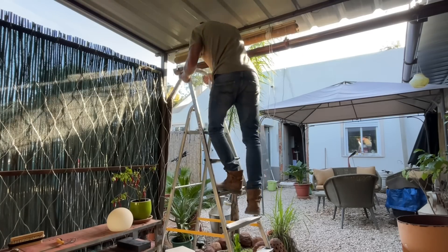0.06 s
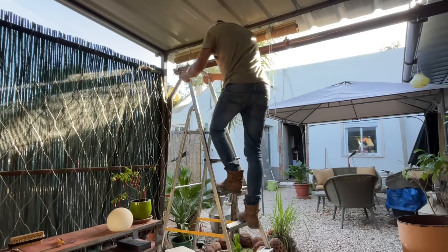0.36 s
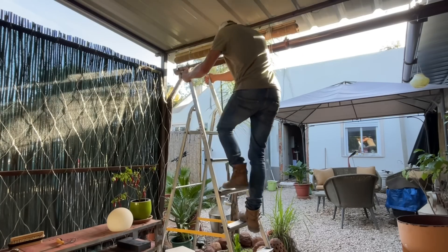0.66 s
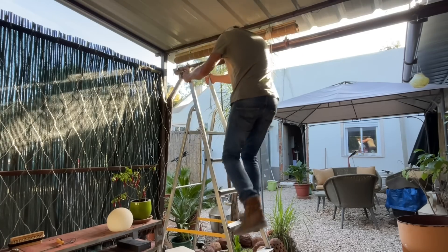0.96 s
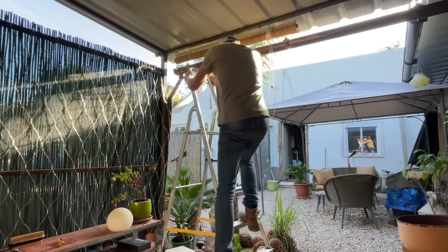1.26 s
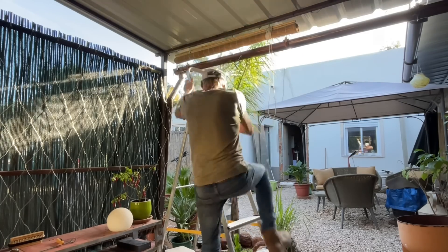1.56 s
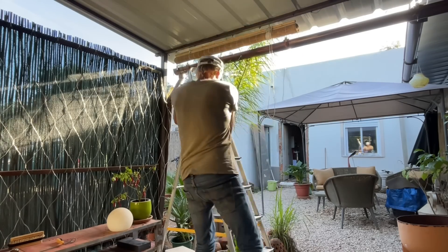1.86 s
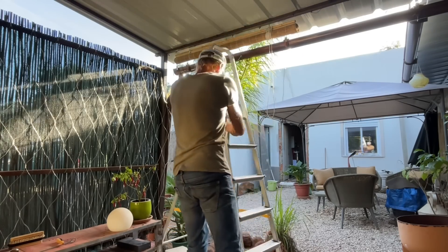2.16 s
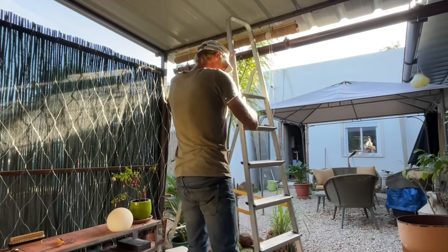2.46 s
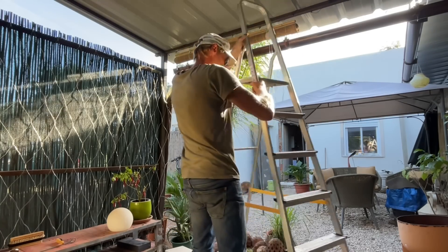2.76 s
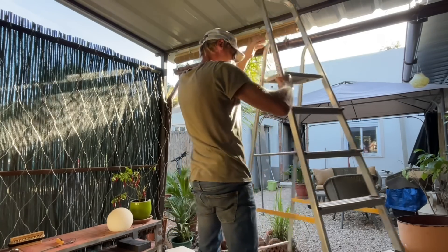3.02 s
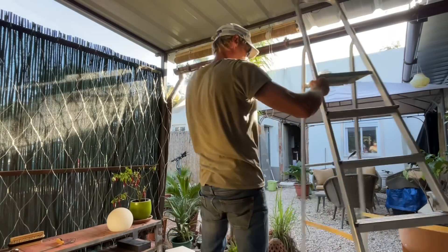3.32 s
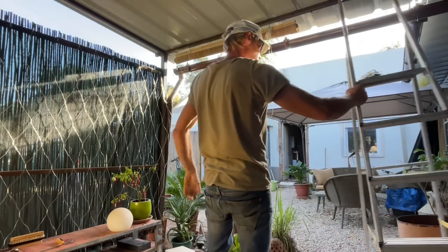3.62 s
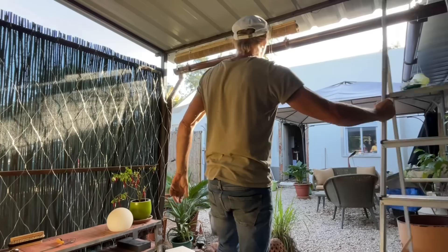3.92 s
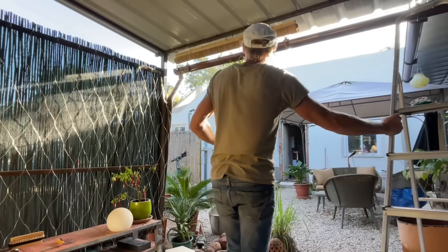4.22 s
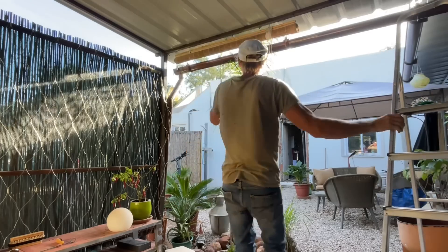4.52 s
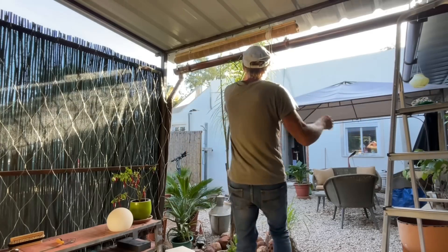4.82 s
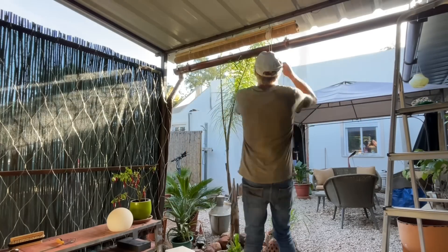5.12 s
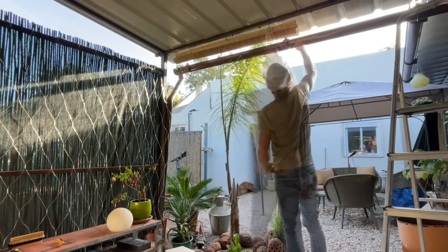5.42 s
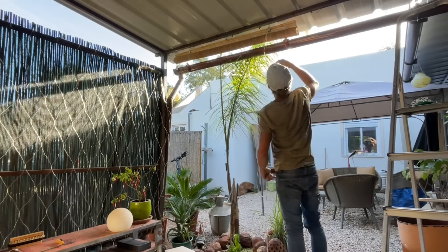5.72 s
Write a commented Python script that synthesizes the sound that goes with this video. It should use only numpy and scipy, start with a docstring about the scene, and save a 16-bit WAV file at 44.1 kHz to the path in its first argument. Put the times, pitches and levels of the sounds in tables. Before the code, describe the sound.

Boots step down a metal stepladder onto gravel, then the ladder clanks sharply and scrapes over the stones.

```python
"""Under a patio roof, a man climbs down an aluminium stepladder and lands on gravel. He lifts the
ladder, swings it aside, scrapes its feet over the stones and shuffles off. Impacts excite the metal's
normal modes, so it clanks and rings; friction on gravel, joints and cloth is a stream of tiny
collisions. Behind him a small bird calls far away and the air rumbles faintly."""
import sys
import numpy as np
from scipy import signal
from scipy.fft import rfft, irfft, next_fast_len
from scipy.io import wavfile
from scipy.ndimage import uniform_filter1d

SR = 44100
rng = np.random.default_rng(int(sys.argv[2]) if len(sys.argv) > 2 else 0)


def master_out(mix):
    """Clip the mix to full scale and print it as 16-bit PCM to the path in sys.argv[1]."""
    frames = np.transpose(np.atleast_2d(mix))
    ceiling = np.clip(frames, -1, 1)
    pcm = np.round(ceiling * 32767).astype(np.int16)
    wavfile.write(sys.argv[1], SR, pcm)


N = 254894
TIME = np.arange(N) / SR
TAIL = TIME[:SR]   # one second for each free decay
SIDES = np.array([[1], [-1]])   # left, right

# Levels in the tables are relative: each source applies its own gain.
# diffuse field, side signal relative to mid (f/Hz, level/dB)
FIELD_WIDTH = [(60, -8), (160, -9.5), (350, -4), (700, -0.5), (1800, -1), (7000, 0.5), (13000, -5.5)]
# diffuse field, left relative to right (f/Hz, level/dB)
FIELD_BALANCE = [(100, 0), (360, -2), (670, 1), (1500, -0.45), (4000, 3.5), (8000, 0.5), (13000, -1.5)]
# reverberation time of the patio (f/Hz, t60/s)
PATIO_DECAY = [(150, 0.55), (700, 0.28), (3000, 0.24), (12000, 0.17)]
# rise and fall of the low rumble, which swells as the boot lands near 1.6 s (t/s, level/dB)
RUMBLE_LEVELS = [(0.0, -66), (1.45, -81), (1.59, -68.5), (3.46, -73.5), (4.01, -66.5), (4.12, -66),
                 (4.83, -66), (5.78, -60.5)]
# spectrum of the moving air (f/Hz, level/dB)
RUMBLE_SPECTRUM = [(15, -36.5), (25, -17.5), (43, -4.5), (59, 5.5), (119, -10.5), (147, -2.5), (194, -22),
                   (260, -18), (340, -35.5), (570, -120)]
# spectrum of the yard's hiss (f/Hz, level/dB)
YARD_SPECTRUM = [(59, -33), (100, -4.5), (168, -22.5), (270, -11.5), (318, -8), (425, -20.5), (461, -15.5),
                 (2220, -25.5), (2840, -26), (13900, -37.5)]
# bird notes (t/s, length/s, start f/Hz, end f/Hz, level/dB)
BIRD_NOTES = [(0.458, 0.03, 2990, 3170, -54), (0.495, 0.022, 3900, 4430, -83),
              (3.429, 0.0487, 3080, 3285, -72.5), (3.48, 0.046, 3850, 4250, -69.5)]

# clothes moving with arms and legs (t/s, length/s, low level/dB, high level/dB)
RUSTLES = [(0.92, 0.15, -69, -66), (1.11, 0.17, -119, -57), (1.31, 0.14, -68, -54),
           (2.79, 0.17, -59, -66.5), (3.08, .16, -67, -80), (3.5, 0.33, -64, -72), (5.63, .13, -76, -68)]
# spectrum of rubbing cloth (f/Hz, level/dB)
CLOTH_SPECTRUM = [(100, -28), (200, 0), (550, 2.5), (1300, -9), (3200, -6), (6000, -12), (11000, -11),
                  (13900, -24.5)]
# the boot touches, takes the weight, rolls and settles (t/s, length/s, weight level/dB, grit level/dB)
LANDING = [(1.448, 0.015, -46, -33), (1.47, .024, -24.5, -22.5), (1.524, 0.016, -25, -31),
           (1.622, 0.039, -51.5, -54.5), (1.65, 0.12, -56, -57.5)]
# spectrum of gravel under the landing boot (f/Hz, level/dB)
LANDING_SPECTRUM = [(35, -25), (70, -19), (150, -2), (230, -5.5), (350, 2), (500, -4.5), (830, -1.5),
                    (1500, -12), (3500, -14), (6000, -17), (10500, -12), (13900, -19.5)]
# feet shuffling on gravel (t/s, length/s, weight level/dB, grit level/dB)
SHUFFLES = [(4.395, 0.052, -45.5, -55.5), (4.446, 0.083, -46, -43.5), (4.54, 0.22, -55, -62),
            (4.69, 0.17, -57, -66.5), (4.915, 0.089, -52.5, -60), (5.016, 0.074, -41, -46.5),
            (5.1, 0.19, -50.5, -54), (5.526, 0.042, -49.5, -50.5)]
# spectrum of shuffled gravel (f/Hz, level/dB)
SHUFFLE_SPECTRUM = [(90, -19), (155, -10.5), (240, 0), (350, 1), (500, -4), (800, -2), (1600, -12.5),
                    (2800, -19), (7000, -20.5), (11000, -19), (13900, -29)]
# pebbles snapping under a sole (t/s, level/dB)
PEBBLE_SNAPS = [(1.629, -39), (2.195, -53), (3.003, -69), (3.383, -66), (3.548, -60.5), (4.379, -41.5),
                (4.471, -50), (4.538, -37), (4.684, -40), (4.792, -54.5), (5.029, -53), (5.539, -41.5)]
# spectrum of a snap (f/Hz, level/dB)
SNAP_SPECTRUM = [(1000, -10.5), (5000, -5.0), (11000, 2.5)]

# a sole catching on a rung (t/s, length/s, low level/dB, high level/dB)
SOLE_SLIDES = [(0, 0.0037, -44, -25), (0.025, 0.0063, -39, -39.5), (0.312, 0.046, -48.5, -65)]
# spectrum of the sliding sole (f/Hz, level/dB)
SOLE_SPECTRUM = [(59, -45), (100, -5), (168, -1), (443, -13.5), (522, 6), (857, -6.5), (1440, -18.5),
                 (1880, -6.5), (2360, -10.5), (3490, -11.5), (3950, -12.5), (8000, -12), (11800, -15.5),
                 (13900, -27)]
# normal modes of a rung (f/Hz, level/dB, t60/s)
RUNG_MODES = [(460, -6, .25), (510, 3, .17), (625, -4, .24), (790, -8, .2), (876, -5, .22), (1017, -8, .2),
              (1290, -7, .12), (1703, -2, .2), (1885, -3, .2), (2400, -7, .18), (3000, -8, .16),
              (3424, 1.5, .17), (3600, -2, .18), (5400, 1, .14)]
# ladder joints rubbing under a changing load (t/s, length/s, low level/dB, high level/dB)
JOINT_RUBS = [(0.425, 0.099, -61, -57), (0.56, .06, -54.5, -52.5), (1.82, 0.028, -58.5, -49.5),
              (1.853, 0.085, -41, -43), (2.06, 0.074, -37, -44), (2.15, .11, -50.5, -60.5),
              (2.37, .075, -62.5, -65.5)]
# spectrum of the rubbing joints (f/Hz, level/dB)
JOINT_SPECTRUM = [(100, -28.5), (220, -7), (600, 1), (1200, -8), (2000, -6.5), (3300, -10), (6000, -21),
                  (13900, -25.5)]
# the ladder's feet sliding over stones (t/s, length/s, judder level/dB, grit level/dB)
FOOT_DRAG = [(3.919, 0.3, -30.5, -28.5)]
# a ladder foot digging in as its load shifts (t/s, length/s, judder level/dB, grit level/dB)
FOOT_DIGS = [(1.472, .035, -27.5, -51), (3.914, 0.041, -27, -20.5), (4.16, 0.062, -25, -23),
             (4.374, 0.023, -47, -58.5), (4.655, 0.032, -44, -51)]
# spectrum of the scraped stones (f/Hz, level/dB)
DRAG_SPECTRUM = [(50, -37), (110, -24), (145, -14.5), (210, -21), (320, 5.5), (450, -7), (700, 1.5),
                 (1100, -6), (1900, -6.5), (2600, -9.5), (5000, -12), (6800, -18.5), (12000, -20.5),
                 (13900, -36)]
# normal modes of the ladder standing on its feet (f/Hz, level/dB, t60/s)
LEG_MODES = [(149, 1, .27), (163, -2, .25), (304, 0, .22), (368, -2, .17), (500, -2, .16), (547, -4, .2),
             (638, 3, .25), (702, 1, .18), (785, 0, .22), (897, -3, .2), (1063, -4, .25), (1275, -3, .25),
             (1368, -6, .25), (1745, -5, .15), (1912, -4, .2), (2003, -5, .2)]
# blows on the ladder (t/s, level/dB, centre f/Hz, thud t60/s)
KNOCKS = [(0.173, -50.5, 1980, .2), (0.311, -33.5, 504, 0.28), (0.312, -48.5, 1860, 0.36),
          (0.438, -54.5, 1380, 0.22), (0.603, -51, 1630, 0.34), (1.435, -49, 2240, 0.35),
          (1.7433, -44.5, 1594, 0.06), (1.871, -50.5, 800, 0.19), (1.972, -26.5, 237, 0.24),
          (2.086, -38, 207, 0.56), (2.917, -63, 825, 0.27), (2.9508, -55, 2230, 0.084),
          (3.043, -60.5, 990, 0.049), (3.189, -58.5, 1190, 0.083), (3.368, -60, 679, 0.38),
          (4.187, -33.5, 795, 0.67), (4.3784, -37, 730, 0.24), (4.653, -49, 1220, .4),
          (4.921, -50, 1460, 0.071), (5.072, -43, 870, 0.75)]
# normal modes of the tubular frame (f/Hz, level/dB, t60/s)
FRAME_MODES = [(149, -12, .5), (205, -5, .45), (312, -9, .33), (376.5, 0, .98), (527, -3, .48),
               (635, -16, .54), (746, -18, .5), (845, -16, .6), (1071, -16, .53), (1272, -20, .55),
               (1416, -21, .36)]
# the platform slams against its stop and rebounds (t/s, level/dB)
PLATFORM_HITS = [(1.9484, -15.5), (1.956, -18)]
# spectrum of the platform's crash (f/Hz, level/dB)
CRASH_SPECTRUM = [(47, -53.5), (80, -19), (235, -7.5), (387, -9), (596, -8.5), (678, -6.5), (740, -3.5),
                  (1160, -9.5), (1610, 0), (2130, -5), (3010, -9), (4250, -15.5), (6990, -16),
                  (12200, -35.5), (13900, -47)]
# decay time of the crash (f/Hz, t60/s)
CRASH_DECAY = [(150, 0.05), (500, 0.5), (1400, 0.25), (3000, 0.23), (7000, 0.23), (13000, 0.21)]
# normal modes of the platform (f/Hz, level/dB, t60/s)
PLATFORM_MODES = [(511, -4, .36), (596, -3, .2), (748, -2, .16), (931, 3, .12), (1055, -2, .18),
                  (1270, 2, .23), (1572, 2, .18), (2223, -6, .18), (2536, -8, .2), (2681, -7, .22),
                  (3070, -5, .15), (3919, -14, .22), (5076, -15, .18)]


def from_db(db):
    """Amplitude grows tenfold for every 20 dB."""
    return 10 ** (np.asarray(db) / 20)


def unit_rms(x):
    """Normalisation to unit mean power."""
    return x / np.sqrt(np.mean(x ** 2) + 1e-20)


def unit_energy(response):
    """A stereo response of unit energy per channel conserves the power of white noise."""
    return response / np.sqrt(np.sum(response ** 2) / 2)


def at_hz(points, hz):
    """Interpolation on a logarithmic frequency axis."""
    knots, values = np.transpose(points)
    return np.interp(np.log(hz + 1), np.log(knots), values)


def fade(t60):
    """Damping: exponential decay by 60 dB in t60 seconds."""
    return np.exp(-np.log(1000) * TAIL / max(t60, 1e-3))


def add(out, onset_s, sound):
    """Superposition: a sound adds to the mix from its onset."""
    start = max(round(onset_s * SR), 0)
    out[:, start:start + sound.shape[-1]] += sound[..., :N - start]


def through(x, response):
    """A linear system convolves its input with its impulse response."""
    return signal.fftconvolve(np.atleast_2d(x), response, axes=-1)[:, :N]


def diffuse(size):
    """Diffuse field: noise from all sides, most coherent between left and right in the bass."""
    padded = next_fast_len(size, True)
    hz = np.fft.rfftfreq(padded, 1 / SR)
    mid, side = rfft(rng.standard_normal((2, padded)))
    pair = mid + SIDES * side * from_db(at_hz(FIELD_WIDTH, hz))
    balance = from_db(SIDES * at_hz(FIELD_BALANCE, hz) / 2)
    return unit_rms(irfft(pair * balance, padded)[:, :size])


def coloured_noise(size, spectrum):
    """Filtering gives diffuse noise a smooth spectral envelope, at unit rms."""
    padded = next_fast_len(size, True)
    gain = from_db(at_hz(spectrum, np.fft.rfftfreq(padded, 1 / SR)))
    return unit_rms(irfft(rfft(diffuse(size), padded) * gain, padded)[:, :size])


def damped(noise, decay):
    """Frequency-dependent damping: each band of a one-second noise decays at its own rate."""
    knots, t60s = np.transpose(decay)
    hz, spectrum = np.fft.rfftfreq(SR, 1 / SR), rfft(noise)
    bands = [irfft(spectrum * at_hz(np.c_[knots, share], hz)) for share in np.eye(len(knots))]
    return sum(band * fade(t60) for band, t60 in zip(bands, t60s))


def ringing(modes):
    """Free vibration is a sum of damped sines; higher modes differ more in phase from left to right."""
    out = 0
    for (hz, db, t60), side in zip(modes, np.sign(rng.uniform(-0.9, 1, len(modes)))):
        phase = SIDES * side * np.arctan(from_db(at_hz(FIELD_WIDTH, hz)))
        out = out + from_db(db) * fade(t60) * np.sin(2 * np.pi * hz * TAIL + phase)
    return out


def contact_band(x, hz, q):
    """The hardness of a contact selects the band that it excites."""
    b, a = signal.iirpeak(hz, q, fs=SR)
    return signal.lfilter(b, a, signal.lfilter(b, a, x))


def impact(hz, q, t60):
    """An impulse excites a short crack and a cluster of close modes; dull blows build up more slowly."""
    envelope = (fade(t60) + fade(.03)) * (1 - fade(6 / hz))
    return unit_rms(contact_band(diffuse(SR), hz, q)) * envelope


def strokes(rows, swell, release):
    """Low and high drive of rubbing movements, which add in power as incoherent sources do."""
    power = np.zeros((2, N))
    for onset_s, length_s, *levels_db in rows:
        progress = (TIME - onset_s) / length_s   # swell and release t60 are in stroke lengths too
        rise = np.sin(np.pi / 2 * np.clip(progress / swell, 0, 1)) ** 2
        fall = np.exp(-np.log(1000) * np.clip((progress - 1) / release, 0, 2))
        power += np.outer(from_db(levels_db), rise * fall) ** 2
    return np.sqrt(power)


def collisions(per_s, spread_db):
    """A Poisson process of tiny impulses of uneven size, with a steady mean power."""
    sizes = from_db(spread_db * np.minimum(rng.exponential(1, N), 4)) * rng.choice([-1, 1], N)
    clicks = sizes * (rng.random(N) < per_s / SR)
    local_power = np.abs(uniform_filter1d(clicks ** 2, size=900))
    return clicks / np.sqrt(local_power + np.mean(clicks ** 2) / 20)


def friction(drives, spectrum, per_s, spread_db, grain_t60, body_db, body_t60=.1):
    """Friction noise: colliding grains ring briefly and excite the body behind them."""
    load, sliding = drives   # load drives the low band, sliding the grit
    clicks, noise = collisions(per_s, spread_db), coloured_noise(N, spectrum)
    body_response = coloured_noise(SR, spectrum) * fade(body_t60)   # many close resonances
    retained = from_db(-120 / (grain_t60 * SR))   # share of a grain's energy left after one sample
    out = 0
    for band, drive in (("low", load), ("high", sliding)):
        crossover = signal.butter(3, 1500, band, fs=SR, output="sos")
        supplied = (collisions(per_s, spread_db) * drive) ** 2 + 1e-18
        energy = signal.lfilter([1 - retained], [1, -retained], supplied)
        grains = unit_rms(signal.sosfilt(crossover, noise)) * np.sqrt(energy)
        body = through(clicks * drive, unit_energy(signal.sosfilt(crossover, body_response)))
        out = out + grains + from_db(body_db) * body
    return out / np.sqrt(1 + from_db(body_db) ** 2)


def patio(x, wet_db):
    """Reverberation: reflections from roof, fence and walls add a short tail."""
    response = damped(diffuse(SR), PATIO_DECAY) * (1 - fade(0.023))
    return x + from_db(wet_db) * through(x, unit_energy(response))


def air(rumble_db=3, hiss_db=-70.5):
    """Ambient noise: moving air rumbles at low frequencies under the yard's broadband hiss."""
    rumble_gain = from_db(rumble_db + np.interp(TIME, *np.transpose(RUMBLE_LEVELS)))
    rumble = rumble_gain * coloured_noise(N, RUMBLE_SPECTRUM)
    return rumble + from_db(hiss_db) * coloured_noise(N, YARD_SPECTRUM)


def bird(rasp=0.05):
    """Random frequency modulation roughens short rising whistles; reverberation blurs them."""
    out = np.zeros((2, N))
    for onset_s, length_s, start_hz, end_hz, db in BIRD_NOTES:
        count = round(length_s * SR)
        jitter = unit_rms(uniform_filter1d(rng.standard_normal(SR), size=24))[:count]
        hz = np.linspace(start_hz, end_hz, count) * (1 + rasp * jitter)
        whistle = np.sin(2 * np.pi * np.cumsum(hz) / SR)
        add(out, onset_s, from_db(db) * np.hanning(count) * whistle)
    return patio(out, wet_db=-1)


def clothes():
    """Sliding friction of cloth on cloth: very fine collisions merge into a rustle."""
    return friction(strokes(RUSTLES, swell=0.7, release=2.2), CLOTH_SPECTRUM,
                    per_s=3600, spread_db=5.5, grain_t60=0.08, body_db=-15)


def gravel_strike(spectrum, onset_s, db, t60):
    """Many stones struck at once sum incoherently to a decaying burst of noise."""
    out = np.zeros((2, N))
    add(out, onset_s, from_db(db) * coloured_noise(SR, spectrum) * fade(t60) * (1 - fade(0.004)))
    return out


def footsteps():
    """Granular friction: gravel crunches under the boots, the heel thuds and single pebbles snap."""
    landing = friction(strokes(LANDING, swell=0.65, release=5), LANDING_SPECTRUM,
                       per_s=720, spread_db=-1, grain_t60=0.034, body_db=7, body_t60=0.12)
    shuffle = friction(strokes(SHUFFLES, swell=0.17, release=2.57), SHUFFLE_SPECTRUM,
                       per_s=350, spread_db=3.5, grain_t60=.04, body_db=-1, body_t60=.08)
    slap = gravel_strike(LANDING_SPECTRUM, onset_s=1.4695, db=-21, t60=0.26)
    out = landing + from_db(-1) * shuffle + slap
    heel = from_db(-37) * impact(hz=58, q=0.97, t60=0.35)
    add(out, onset_s=1.5, sound=heel)
    snap_envelope = fade(.06) * .75 + fade(.007)
    for onset_s, db in PEBBLE_SNAPS:
        add(out, onset_s, from_db(db) * coloured_noise(SR, SNAP_SPECTRUM) * snap_envelope)
    return patio(out, wet_db=-12.5)


def sole_on_rung():
    """Forced vibration: friction from a sliding sole drives a rung's modes into a squeal."""
    load, speed = strokes(SOLE_SLIDES, swell=0.088, release=5.5)
    rung_drive = collisions(per_s=1600, spread_db=2.5) * speed
    rung = through(rung_drive, unit_energy(contact_band(ringing(RUNG_MODES), hz=2400, q=.25)))
    sole = friction((load, speed), SOLE_SPECTRUM,
                    per_s=3200, spread_db=4.5, grain_t60=0.28, body_db=-2, body_t60=0.13)
    return from_db(2) * rung + from_db(-1) * sole


def ladder_joints():
    """Dry friction: the joints rub under a changing load."""
    return friction(strokes(JOINT_RUBS, swell=.5, release=2.8), JOINT_SPECTRUM,
                    per_s=310, spread_db=1.5, grain_t60=.07, body_db=4.5, body_t60=0.053)


def ladder_drag():
    """Stick-slip motion: the feet strike, then catch and slip on the stones, shaking the legs."""
    sliding = strokes(FOOT_DRAG, swell=0.036, release=1.34)
    digging = strokes(FOOT_DIGS, swell=.4, release=3.06)
    judder, grit = np.hypot(sliding, digging)
    slips = collisions(per_s=600, spread_db=3.2) * judder
    bass_cut = signal.butter(4, 140, "high", fs=SR, output="sos")   # the legs' ringing carries no deep bass
    legs = through(slips, unit_energy(signal.sosfilt(bass_cut, ringing(LEG_MODES))))
    stones = friction((judder, grit), DRAG_SPECTRUM,
                      per_s=420, spread_db=4, grain_t60=.035, body_db=2, body_t60=.12)
    strike = gravel_strike(DRAG_SPECTRUM, onset_s=3.9235, db=-26, t60=0.11)
    return patio(from_db(-2) * legs + from_db(-1) * stones + strike, wet_db=-10.5)


def ladder_knocks(q=1.25, dull_hz=208, loose_t60=.3, loss_db_per_octave=16):
    """Impulse excitation: each blow rings a rung and the frame; dull, loose blows ring the frame most."""
    out = np.zeros((2, N))
    rung = ringing(RUNG_MODES)
    frame = ringing(FRAME_MODES) * (1 - fade(0.021))   # swells as the vibration spreads
    for onset_s, db, hz, t60 in KNOCKS:
        thud = impact(hz, q, t60)
        rung_tone = unit_energy(contact_band(rung, hz, q)) * np.sqrt(np.sum(thud ** 2) / 2)
        grip = fade(2.2 * t60)   # a hand or foot damps the rung
        frame_gain = from_db(-loss_db_per_octave * np.log2(hz / dull_hz)) * t60 / loose_t60
        add(out, onset_s, from_db(db) * (thud + rung_tone * grip + frame_gain * frame))
    return out


def platform_clank():
    """Metal-on-metal impact: a bright crack, then a dense crash with the platform's modes standing out."""
    out = np.zeros((2, N))
    crack = from_db(-27) * impact(hz=6600, q=0.99, t60=0.13)
    add(out, PLATFORM_HITS[0][0], crack)
    build_up = 1 - fade(.012)
    for onset_s, db in PLATFORM_HITS:
        crash = damped(coloured_noise(SR, CRASH_SPECTRUM), CRASH_DECAY)
        ring = from_db(-9) * ringing(PLATFORM_MODES)
        add(out, onset_s, from_db(db) * (crash + ring) * build_up)
    return patio(out, wet_db=-16)


def scene():
    """Superposition: the pressures from ladder, man and yard add."""
    ladder = ladder_knocks() + platform_clank() + ladder_drag() + sole_on_rung() + ladder_joints()
    man = footsteps() + clothes()
    yard = bird() + air()
    return ladder + man + yard


def record(dry):
    """An elliptic low-pass filter cuts the treble steeply above 13.7 kHz."""
    return signal.sosfilt(signal.ellip(10, .3, 70, 13700, fs=SR, output="sos"), dry)


dry = scene()
out = record(dry)
master_out(out)
```